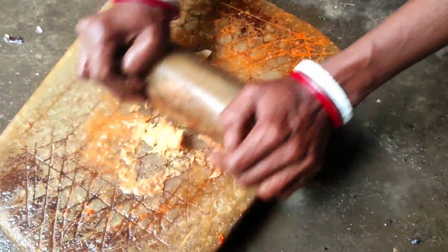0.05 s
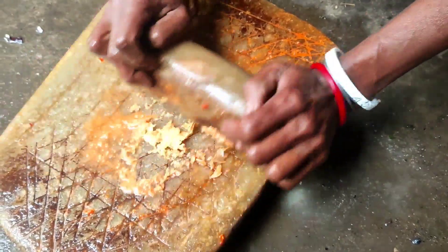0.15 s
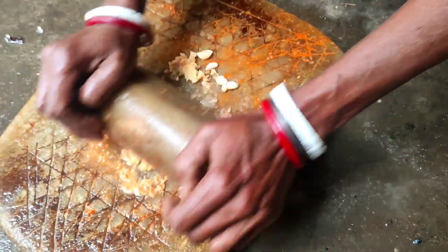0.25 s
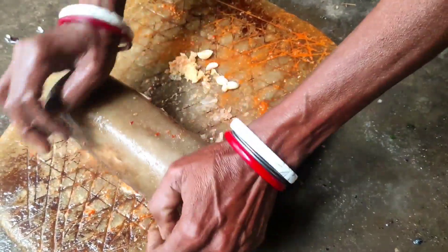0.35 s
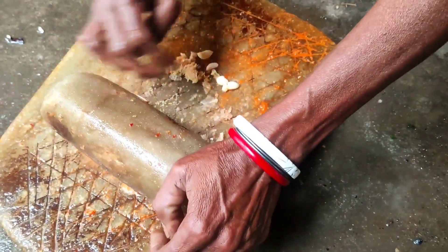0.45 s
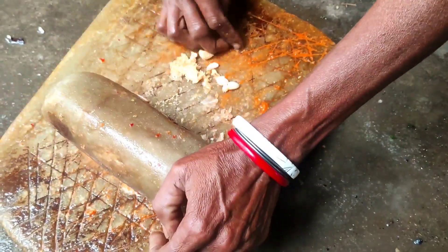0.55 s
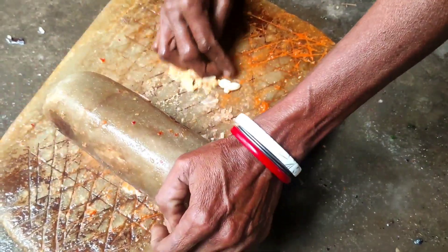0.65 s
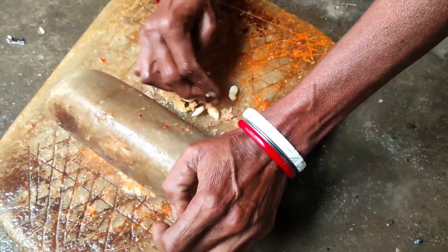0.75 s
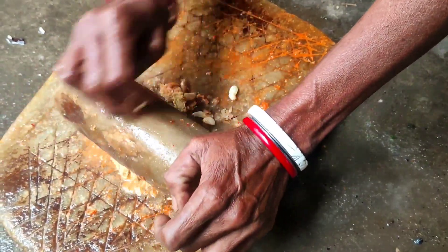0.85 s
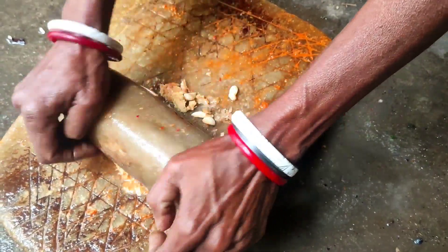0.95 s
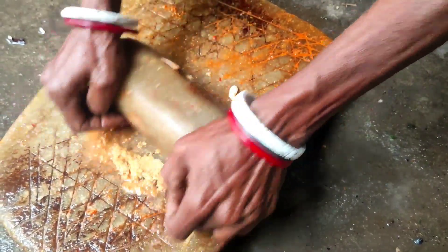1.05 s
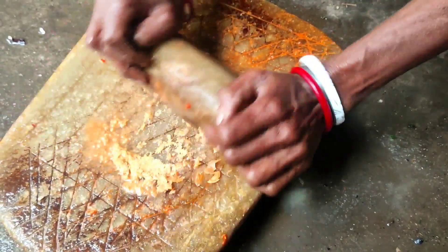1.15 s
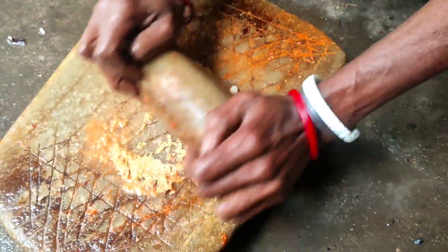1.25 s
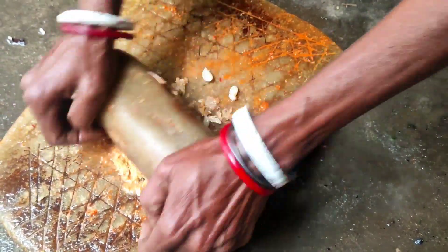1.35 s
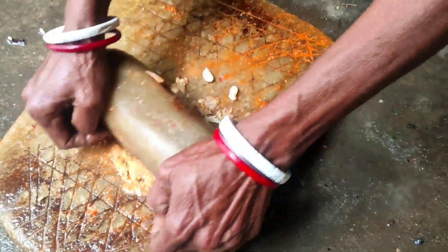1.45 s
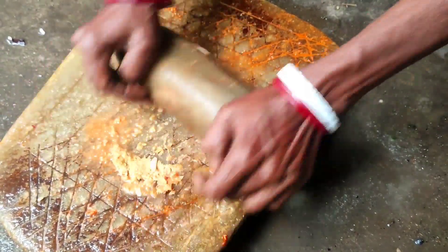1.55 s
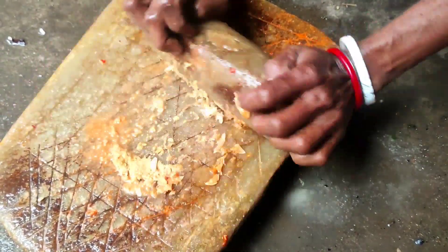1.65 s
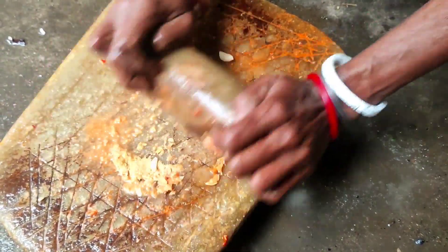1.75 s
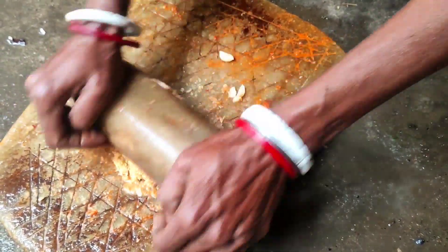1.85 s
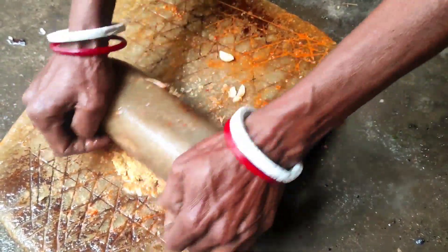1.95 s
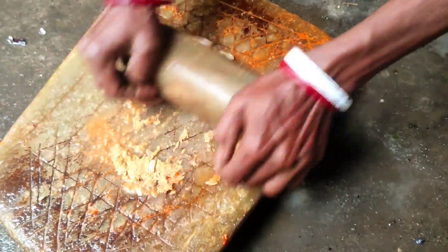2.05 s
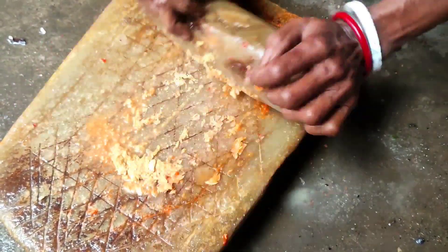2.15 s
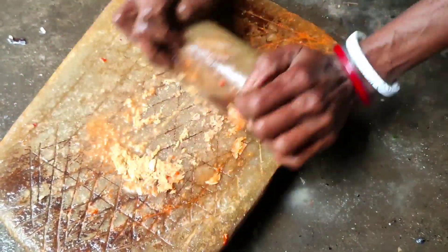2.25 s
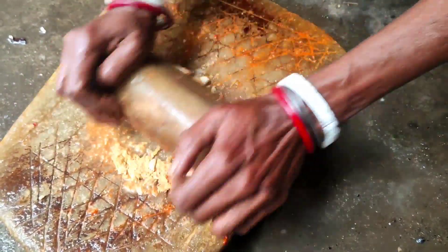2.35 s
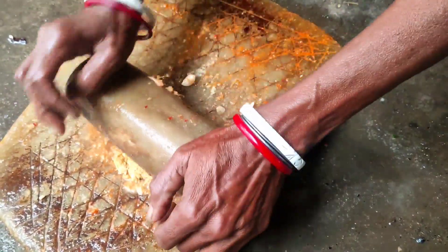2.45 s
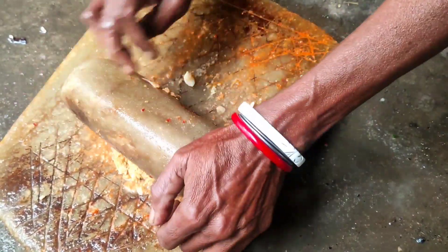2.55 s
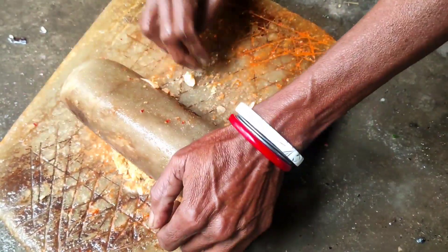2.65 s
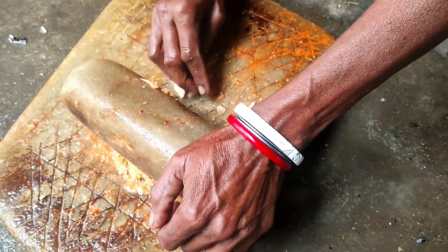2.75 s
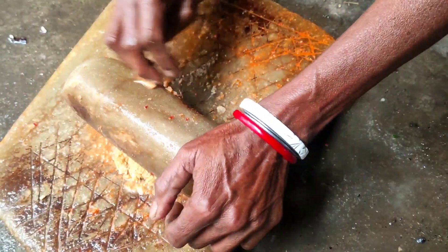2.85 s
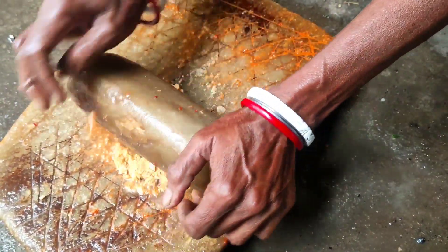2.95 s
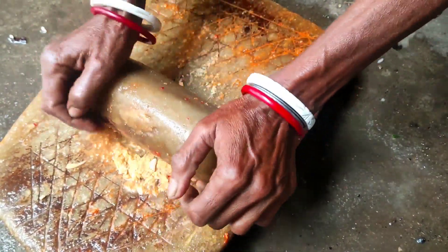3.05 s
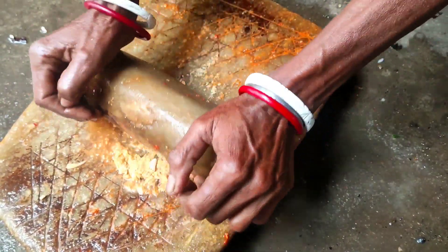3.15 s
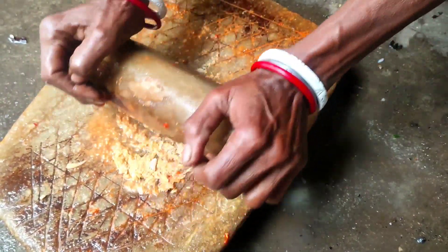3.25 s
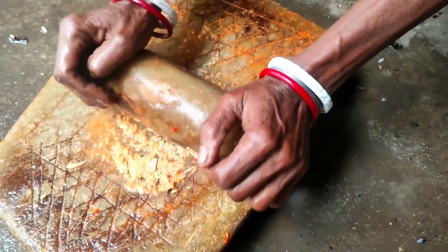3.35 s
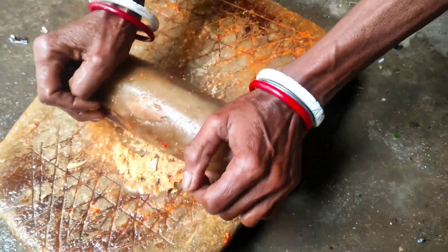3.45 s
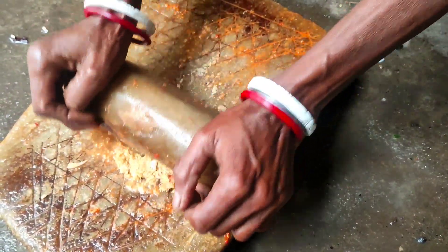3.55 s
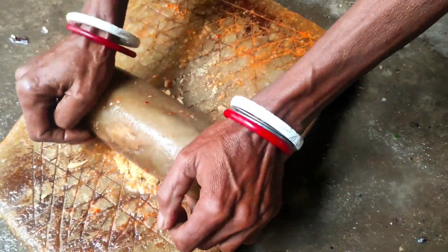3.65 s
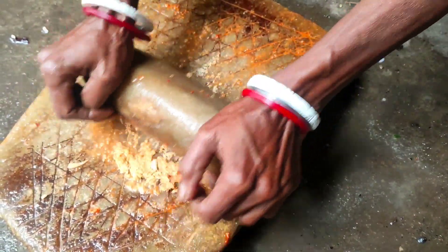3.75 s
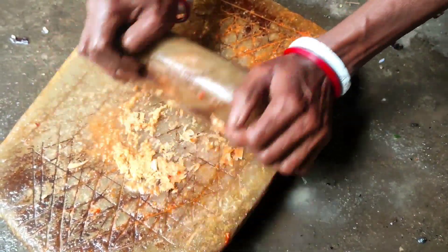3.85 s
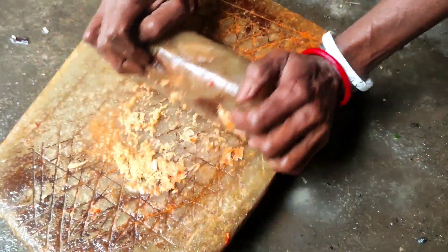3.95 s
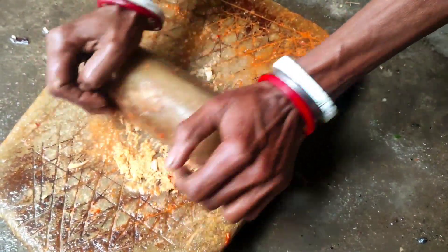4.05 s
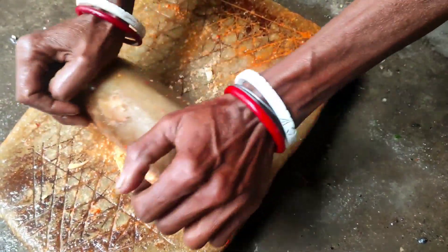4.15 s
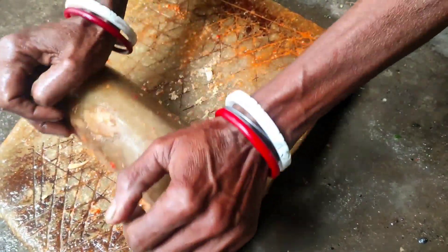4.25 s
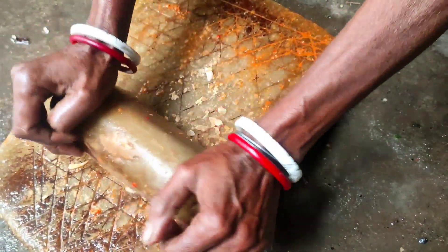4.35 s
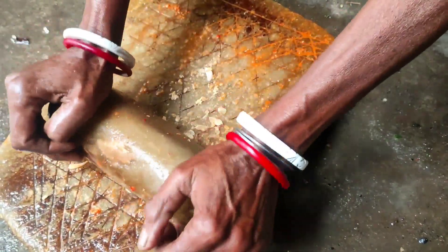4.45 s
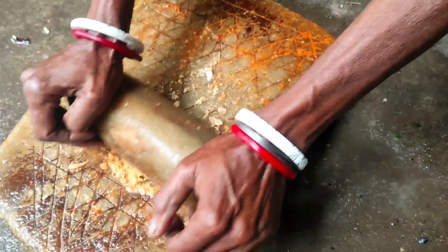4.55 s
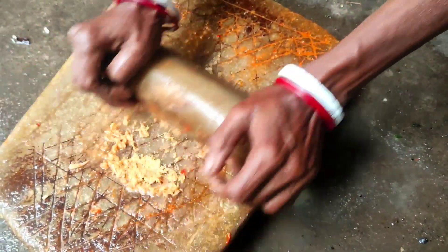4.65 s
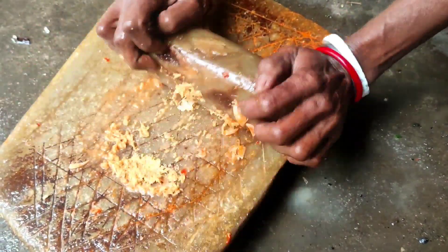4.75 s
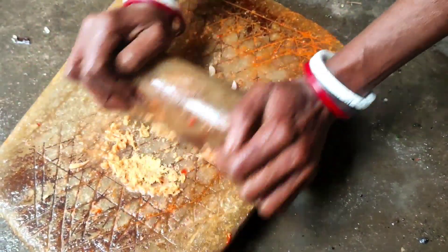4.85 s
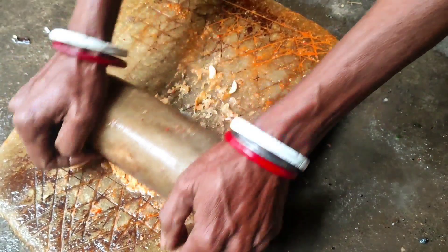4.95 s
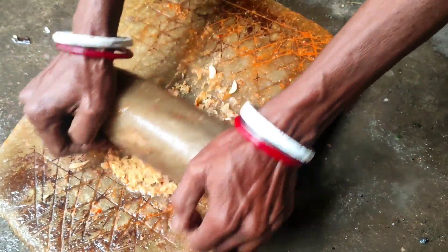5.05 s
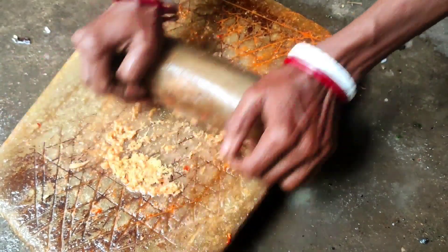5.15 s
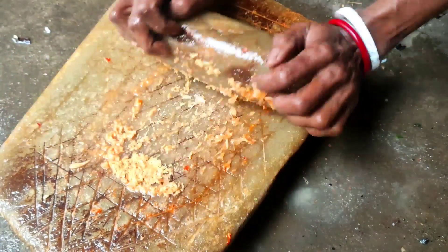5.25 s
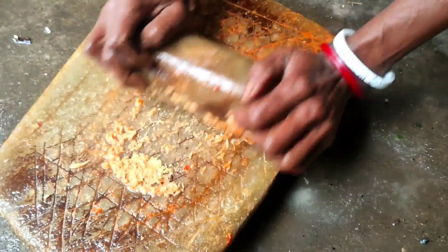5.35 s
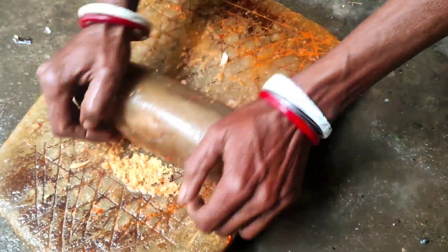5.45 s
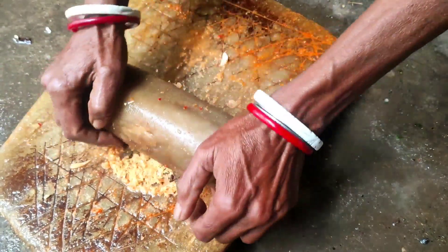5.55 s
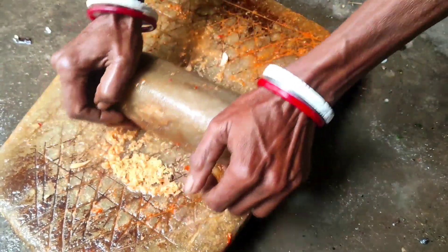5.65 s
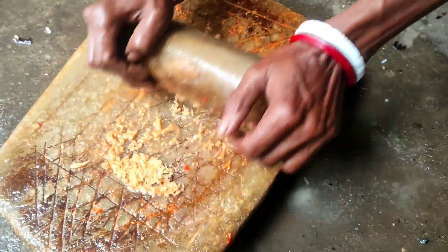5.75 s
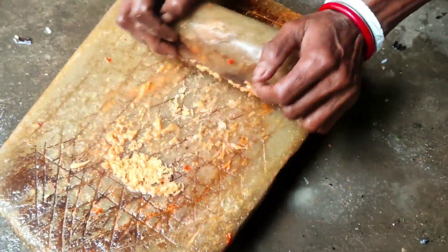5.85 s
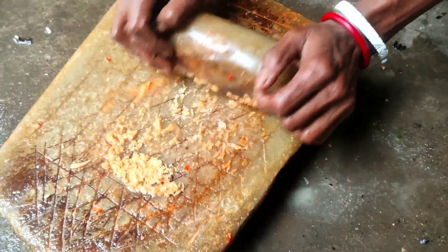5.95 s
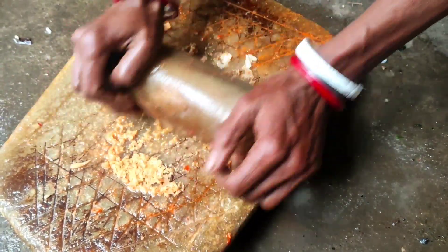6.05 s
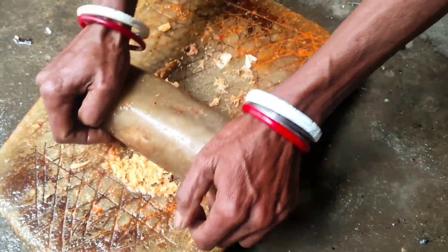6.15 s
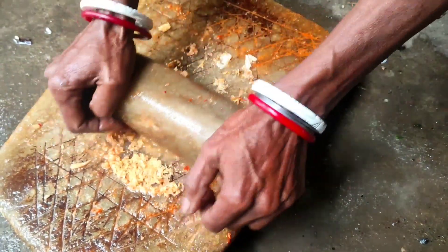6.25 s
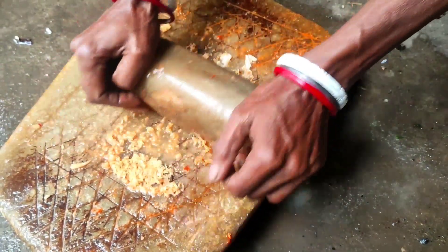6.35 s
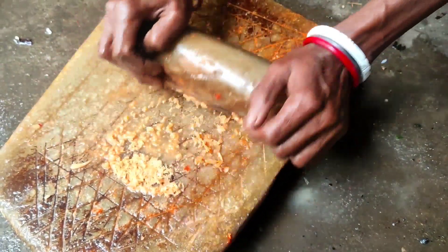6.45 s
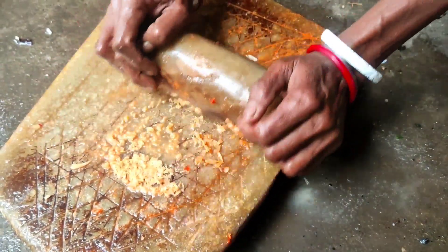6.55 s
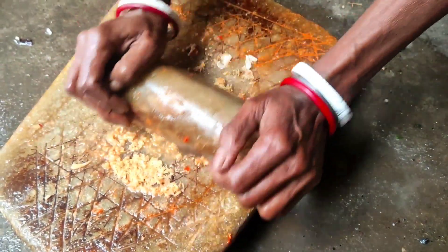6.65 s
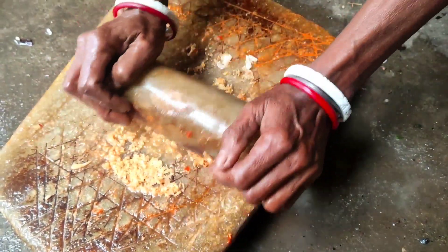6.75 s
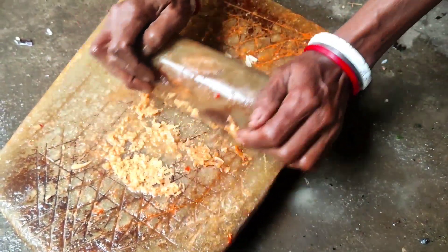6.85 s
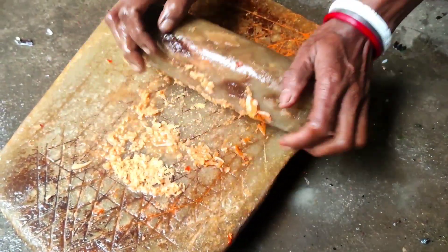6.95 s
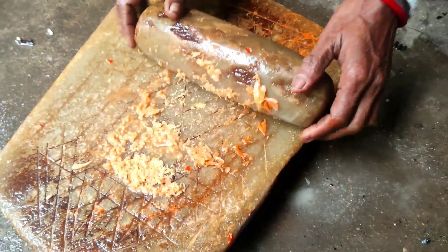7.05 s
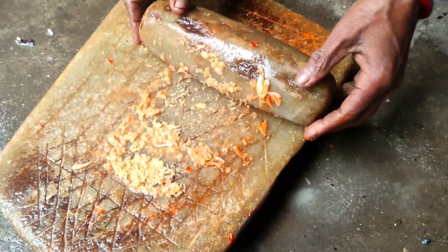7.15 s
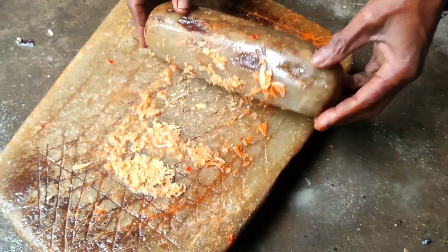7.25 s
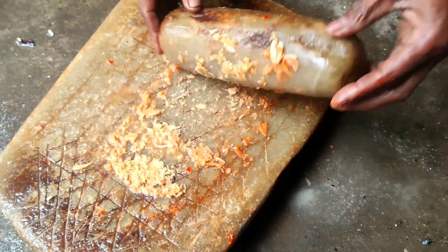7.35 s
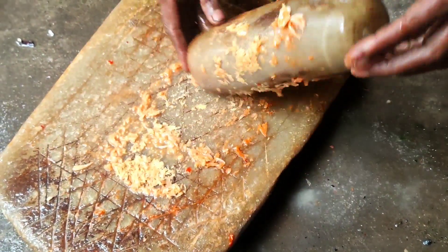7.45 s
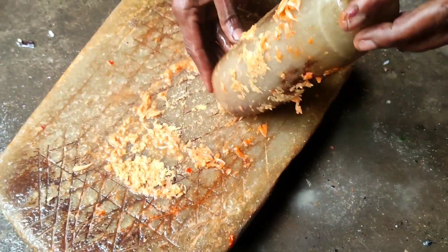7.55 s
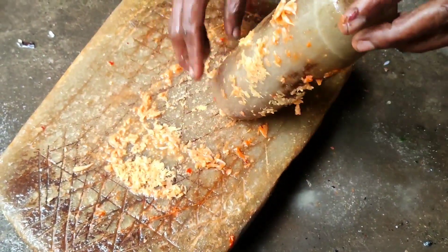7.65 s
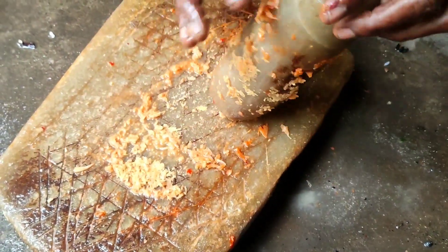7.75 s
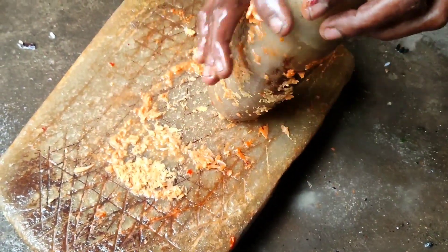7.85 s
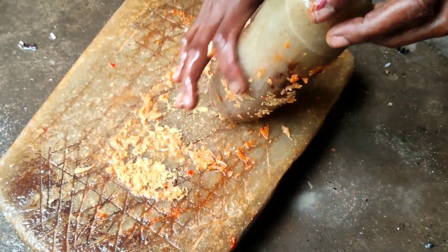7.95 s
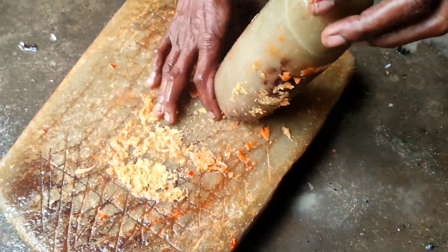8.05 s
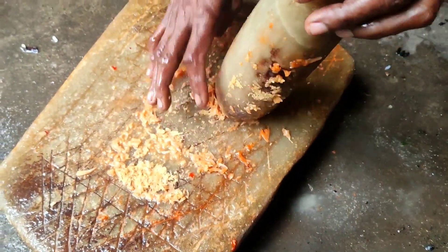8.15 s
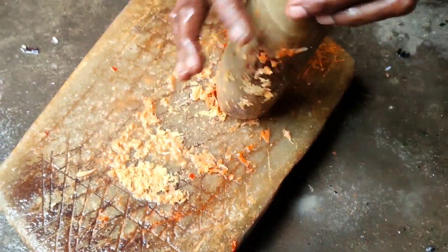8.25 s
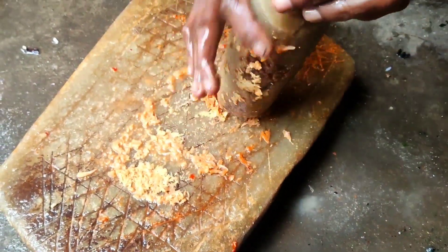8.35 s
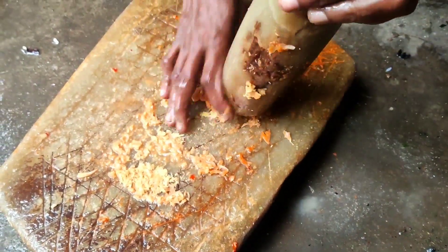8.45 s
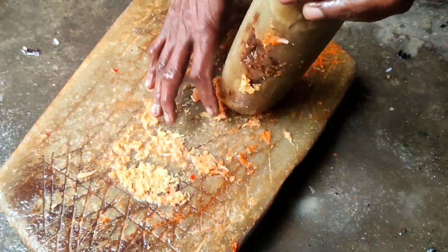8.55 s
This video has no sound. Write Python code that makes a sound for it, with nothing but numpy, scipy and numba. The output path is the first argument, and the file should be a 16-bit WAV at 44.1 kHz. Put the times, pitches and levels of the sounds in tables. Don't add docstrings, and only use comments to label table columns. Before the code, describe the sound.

Hand grinding of spice on a stone slab, heard close in stereo. Faint vessel clinks and soft grit come first, then a cluster of sharp stone knocks with short rattling rebounds, swelling scrapes and thin, dry bangle taps. After a few more isolated clacks, hollow gliding scrapes lead to a weaker final thud and fading grit. A small reverberant room, steady low air noise, the loudest hits slightly clipped.

```python
import sys
import numpy as np
from scipy import signal
from scipy.fft import rfft, irfft, next_fast_len
from scipy.io import wavfile
from numba import njit

SR = 44100
rng = np.random.default_rng(int(sys.argv[2]) if len(sys.argv) > 2 else 0)


def wrap_up_sound(samples):
    columns = np.atleast_2d(samples).T
    tamed = np.clip(columns, -1, 1)
    steps = np.round(tamed * 32767).astype(np.int16)
    wavfile.write(sys.argv[1], SR, steps)


def invert_db(x):
    u = np.asarray(x, float) / 20
    return 10 ** u


N = 379260
TIME = np.arange(N) / SR
PAN_DB, LEFT_LAG_S = 1.2, 0.00013
ROCKING_DB = 3.5


def rms_one(x):
    return x / np.sqrt(np.mean(x ** 2) + 1e-20)


def at_hz(points, hz):
    points = np.array(points)
    return np.interp(np.log(hz), np.log(points[:, 0]), points[:, 1])


def filtered(x, spectrum):
    size = next_fast_len(N)
    hz = np.maximum(np.arange(size // 2 + 1) * SR / size, 1)
    return irfft(rfft(x, size) * invert_db(at_hz(spectrum, hz)), size)[..., :N]


def band(x, low_hz, high_hz):
    return signal.sosfilt(signal.butter(2, [low_hz, high_hz], "band", fs=SR, output="sos"), x)


def high_pass(x, order, hz):
    return signal.sosfilt(signal.butter(order, hz, "high", fs=SR, output="sos"), x)


def drift(rate_hz):
    r = np.exp(-80 * np.pi * rate_hz / SR)
    slow = signal.lfilter([1], [1, -2 * r, r * r], rng.standard_normal(N // 40 + 2002))[2000:]
    return np.interp(np.arange(N) / 40, np.arange(len(slow)), rms_one(slow))


def grains(per_s, spread_db):
    sizes = invert_db(spread_db * np.minimum(rng.exponential(1, N), 4))
    sizes = sizes * rng.choice([-1, 1], N)
    return rms_one(sizes * (rng.random(N) < per_s / SR))


def ring(force, hz, t60):
    r = invert_db(-60 / (max(t60, .002) * SR))
    w = 2 * np.pi * hz / SR
    return signal.lfilter([0, np.sin(w)], [1, -2 * r * np.cos(w), r * r], force + 1e-18)


@njit
def glide(x, hz, r, rate):
    y = np.zeros(len(x))
    for i in range(2, len(x)):
        drive = (1 - r * r) / 2 * (x[i] - x[i - 2])
        y[i] = drive + 2 * r * np.cos(2 * np.pi * hz[i] / rate) * y[i - 1] - r * r * y[i - 2]
    return y


def ports(x, pan_db):
    left = np.interp(TIME - LEFT_LAG_S, TIME, x)
    return np.array([left * invert_db(pan_db / 2), x * invert_db(-pan_db / 2)])


def swells(s, rise_s, fall_s, peak_db, roundness):
    out = np.zeros(N // 20 + 1)
    for at, rise, fall, db in zip(s, rise_s, fall_s, peak_db):
        away = np.arange(len(out)) * 20 / SR - at
        out += invert_db(db - 20 * np.abs(away / np.where(away < 0, rise, fall)) ** roundness)
    return np.interp(np.arange(N) / 20, np.arange(len(out)), out)


MODE_SPREAD_DB = 3.5


def strike(times, touches, strengths_db, modes):
    out = np.zeros(N)
    for hz, level_db, t60 in modes:
        force, own_db = np.zeros(N + SR), MODE_SPREAD_DB * rng.standard_normal(len(times))
        for s, touch, db in zip(times, touches, strengths_db + own_db):
            force[round(s * SR):][:len(touch)] += touch * invert_db(db + level_db)
        out += ring(force[:N], hz, t60)
    return out


# (frequency [Hz], density [dB])
HISS = [(15, -50.5), (25, -6), (200, -2), (427, -1), (775, -3.5), (962, -6.5), (1940, -5), (3520, -8.5),
        (4250, -9), (7110, -13.5), (8140, -23.5), (14000, -24), (16000, -30)]
# (frequency [Hz], likeness [0..1])
HISS_LIKENESS = [(40, 1), (300, 1), (1000, 0.069), (3000, 0.0313), (12000, 0.033)]
HISS_DB = -58.5


def hiss():
    def share(sign):
        points = []
        for hz, db in HISS:
            likeness = np.clip(at_hz(HISS_LIKENESS, hz), 0, .98)
            points.append((hz, db + 10 * np.log10(1 + sign * likeness)))
        return points

    mid, side = rng.standard_normal((2, N))
    mid, side = filtered(mid, share(1)), filtered(side, share(-1))
    return invert_db(HISS_DB + 1.5) * rms_one(np.array([mid + side, mid - side]))


# (delay [s], level [dB])
ECHOES = [(.0031, -21.5), (.0057, -27.5), (.0125, -10), (.0171, -23.5)]
# (frequency [Hz], t60 [s])
ROOM = [(150, 0.81), (700, 0.44), (2000, 0.49), (6000, 0.342), (14000, 0.11)]


def room(x, wet_db):
    after = np.arange(SR // 2) / SR
    tail, white = 0, rng.standard_normal((2, len(after)))
    white = white + 0.64 * signal.lfilter([.1], [1, -.9], white[0] + white[1])
    for low in 60 * 2. ** np.arange(8):
        t60 = max(at_hz(ROOM, low * np.sqrt(2)), .05)
        tail = tail + band(white, low, 2 * low) * invert_db(-60 * after / t60)
    tail = tail * np.minimum(after / 0.0095, 1) * invert_db(wet_db)
    early = np.zeros((2, round(.04 * SR)))
    for k, (s, db) in enumerate(ECHOES):
        left = round(s * SR)
        right = left + 6 * (k % 3)
        early[(0, 1), (left, right)] = invert_db(db) * (-1) ** k
    early = signal.lfilter([.3], [1, -.7], early)
    reflected = signal.fftconvolve(x, early, axes=1)[:, :N]
    return reflected + signal.fftconvolve(x.mean(0)[None], tail, axes=1)[:, :N]


# (time [s], centre [Hz], width [Hz], level
# [dB], t60 [s])
CLINKS = [(0.056, 1370, 170, -44, 0.22), (.07, 2070, 170, -46, 0.16), (0.55, 1385, 200, -45, 0.26),
          (.45, 1340, 130, -55, 2), (2.655, 2700, 905, -53, 0.28), (2.78, 4230, 300, -53, 0.055),
          (1.154, 6770, 920, -39.5, 0.46), (1.155, 5530, 300, -43, 0.4), (1.23, 6620, 626, -35.5, 0.36),
          (1.238, 4120, 258, -39, 0.34), (3.011, 5900, 498, -46, 0.51), (3.008, 6710, 200, -45.5, 0.26),
          (3.011, 5060, 302, -52, 0.47), (4.325, 560, 59, -58, 0.67), (4.33, 1550, 80, -57, 0.33),
          (5.599, 9170, 202, -46, 0.11), (8.135, 4590, 300, -41.5, 0.045), (8.539, 1870, 594, -54.5, 2)]


def clinks():
    after, out = np.arange(SR) / SR, np.zeros((2, N + SR))
    for s, hz, width_hz, db, t60 in CLINKS:
        rattle = rng.standard_normal((2, SR)) * invert_db(1.0 * rng.standard_normal(SR))
        rattle = rattle + 0.25 * rattle[::-1]
        rattle = rms_one(band(rattle, hz - width_hz / 2, hz + width_hz / 2))
        decay = invert_db(db - 60 * after / t60) * np.minimum(after / 0.0062, 1)
        out[:, round(s * SR):][:, :SR] += rattle * decay
    return out[:, :N]


# (time [s], level [dB])
THUMPS = [
    (3.169, -57),
    (3.441, -53),
    (3.672, -40.5),
    (6.956, -54),
    (7.582, -46),
]
# (frequency [Hz], level [dB], t60 [s])
FLOOR = [(65, -3, 0.048), (112, -7, 0.16)]


def thumps():
    s, thump_db = np.transpose(THUMPS)
    push = np.hanning(200) / 100
    return strike(s, [push] * len(s), thump_db - 0.5, FLOOR)


# (fastest moment [s], rise to peak over 20 dB [s], fall over 20 dB [s],
# scrape [dB], grit [dB])
STROKES = [(.02, .2, 0.45, -51.5, -50), (.464, 0.23, 0.43, -49, -54.5), (1.138, 0.054, 0.078, -49, -55),
           (1.255, 0.17, 0.055, -34, -47), (1.36, 0.12, 0.11, -51, -51), (1.62, 0.21, 0.19, -52, -56),
           (1.782, 0.11, 0.17, -47.5, -43.5), (2.02, 0.2, 0.13, -46, -44.5),
           (2.186, 0.15, 0.12, -43, -44.5), (2.37, 0.039, 0.22, -36, -47), (3.034, 0.16, 0.12, -45.5, -49),
           (3.48, 0.094, 0.075, -39, -52.5), (3.798, 0.19, 0.2, -46.5, -47.5), (4.04, 0.1, 0.39, -56, -53),
           (4.496, 0.051, 0.38, -40, -46.5), (5.0, 0.28, 0.48, -38, -47.5), (5.33, 0.18, 0.31, -51, -49),
           (6.16, 0.23, 0.77, -43, -48.5), (6.56, 0.31, 0.22, -38, -41), (7.45, .15, 0.52, -40, -46.5),
           (7.74, 0.19, 0.22, -36.5, -47.5), (8.07, 0.033, 0.11, -56, -56), (8.5, 0.035, 0.81, -56, -57)]
STROKE_ROUND = 1.96
RESTING_SCRAPE_DB, RESTING_GRIT_DB = -90, -66.5


def pressure():
    s, rise_s, fall_s, scrape_db, grit_db = np.transpose(STROKES)
    scraping = swells(s, rise_s, fall_s, scrape_db, STROKE_ROUND) + invert_db(RESTING_SCRAPE_DB)
    grinding = swells(s, rise_s, fall_s, grit_db, STROKE_ROUND) + invert_db(RESTING_GRIT_DB)
    return scraping, grinding


# (time [s], rattle [dB], rise over 20 dB [s], fall over 20 dB [s])
SHAKES = [(.02, -61, 0.14, 0.4), (.186, -67, 0.028, 0.45), (0.389, -33.5, 0.032, 0.058),
          (.694, -60, 0.028, 0.025), (1.057, -55.5, 0.011, 0.05), (1.17, -46.5, 0.022, 0.11),
          (1.252, -44.5, 0.046, 0.11), (1.462, -31, 0.014, 0.066), (1.7, -55.5, 0.044, 0.56),
          (1.946, -38.5, 0.028, 0.12), (2.29, -76, 0.009, 0.01), (2.395, -42, 0.019, 0.055),
          (2.488, -40, 0.051, 0.057), (3.012, -51, 0.057, 0.094), (3.224, -53, 0.03, 0.042),
          (3.427, -45.5, 0.016, 0.043), (3.58, -51.5, 0.07, 0.025), (3.693, -44, 0.045, 0.045),
          (4.009, -39, 0.005, 0.011), (4.201, -36, 0.082, 0.038), (4.452, -34.5, 0.0052, 0.029),
          (4.638, -45, 0.065, 0.12), (4.846, -53, 0.044, 0.36), (5.048, -37, 0.014, 0.044),
          (5.557, -36, 0.039, 0.052), (6.211, -42.5, 0.0044, 0.072), (6.64, -56.5, .03, 0.075),
          (6.789, -39, 0.024, 0.061), (7.27, -49, 0.028, 0.023), (8.04, -64.5, 0.057, 0.21)]
# (time [s], peak [dB], left over right [dB])
TAPS = [(0.183, -37, 0), (0.384, -30, 4), (0.677, -43, 4), (1.059, -43, -5), (1.1628, -28, 3.5),
        (1.469, -25, -5), (1.745, -28, 4.5), (1.942, -32, 5), (2.3974, -37, 7), (2.4575, -28, 7),
        (2.783, -47, 1.5), (2.229, -33, 11), (2.243, -31.5, 11), (2.4817, -26.5, 4.5), (2.8782, -30.5, 3),
        (3.227, -36.5, 6), (3.4288, -30.5, 9), (3.57, -29.5, -2.5), (3.6611, -39, -7), (3.67, -27, 17),
        (3.9913, -45, 4), (4.0083, -31, -8), (4.18, -30, 0), (4.1952, -20.5, -3), (5.0315, -29, 1),
        (5.5303, -49, 0), (5.5493, -30.5, -2), (6.344, -43, -1), (4.105, -37, 9), (4.6326, -21.5, 5),
        (4.848, -31, 4), (4.9395, -33.5, 13), (5.0519, -20.5, 0), (5.341, -26.5, 11.5), (5.634, -38, 1),
        (5.788, -36.5, 1), (6.06, -32.5, 2), (6.2147, -22.5, 7), (6.6348, -30.5, 0.5),
        (6.7744, -30.5, -3.5), (7.1803, -40, 2), (7.25, -44.5, 11), (7.567, -43, 8), (8.031, -38.5, 16),
        (8.0967, -45, -2), (8.1387, -42.5, 8)]
# (frequency [Hz], level [dB], t60 [s])
BANGLES = [(4250, -3, .03), (4700, -6, .02), (6070, -3, .03), (6750, -3, .03), (7350, -6, .03),
           (9250, -2, .03), (9570, 0, .03), (10800, -5, .02), (11900, -4, .02), (12600, -1, .02),
           (13900, -6, .02), (15400, -6, .006)]
# (frequency [Hz], density [dB])
RUSTLE = [(1470, -48), (2500, -6), (4310, 4.5), (5190, -1.5), (6600, 3.5), (8800, -1.5), (9510, -1),
          (12400, -1), (16000, -22)]
SHAKE_ROUND = 0.82
DRAG_RATTLE_DB = -27
RING_SHARE_DB = -33


def bangles():
    s, shake_db, rise_s, fall_s = np.transpose(SHAKES)
    dragging = pressure()[1] - invert_db(RESTING_GRIT_DB)
    shaking = swells(s, rise_s, fall_s, shake_db, SHAKE_ROUND) + invert_db(DRAG_RATTLE_DB) * dragging
    effort, after = shaking * invert_db([[1.5], [-1.5]]), np.arange(1323) / SR
    for s, db, pan_db in TAPS:
        at = round(s * SR)
        sides_db = pan_db / 2 * np.array([[1], [-1]])
        effort[:, at:at + len(after)] += invert_db(db - 10.5 + sides_db) * np.exp(-after / 0.005)
    apart = np.array([grains(6600, 5.2), grains(5500, 3.5)])
    shower = 0.43 * grains(6000, 2.25) + 1.31 * apart
    white = shower * effort
    rung = sum(invert_db(db) * ring(white, hz, 1.6 * t60) for hz, db, t60 in BANGLES)
    flecks = 0
    for low in 2000 * 1.25 ** np.arange(9):
        flecks = flecks + band(shower, low, 1.25 * low) * invert_db(2.0 * drift(30))
    return effort * rms_one(filtered(flecks, RUSTLE)) + invert_db(RING_SHARE_DB) * rung


# (start [s], length [s], from [Hz], to [Hz], level [dB])
WEDGE = [
    (3.722, 0.26, 900, 764, -58.5),
    (4.992, 0.25, 1390, 574, -45),
    (5.184, 0.16, 760, 520, -46.5),
    (6.172, 0.22, 685, 700, -52.5),
    (6.398, 0.14, 920, 1290, -43.5),
    (6.584, 0.17, 760, 510, -51),
    (7.636, 0.14, 1950, 1790, -41),
    (7.715, 0.33, 1135, 730, -53),
]


def wedge_motion():
    s, length_s, from_hz, to_hz, db = np.transpose(WEDGE)
    corners_s = np.ravel([s, s + length_s], "F")
    hz = np.exp(np.interp(TIME, corners_s, np.log(np.ravel([from_hz, to_hz], "F"))))
    return hz, swells(s + length_s / 2, length_s / 2, length_s / 2, db, 3.0)


PATCHY_DB = 2.6


def patchy(x, per_s):
    edges = 600 * 1.25 ** np.arange(15)
    out = x
    for low, high in zip(edges, edges[1:]):
        out = out + band(x, low, high) * (invert_db(PATCHY_DB * drift(per_s)) - 1)
    return out


# (frequency [Hz], density [dB])
SCRAPE = [(71, -50), (120, -30), (162, -12), (262, -22.5), (369, -13), (477, -7), (1310, -3), (1580, -1.5),
          (1840, 1), (3600, -2), (4680, -34), (7920, -120)]
# (frequency [Hz], density [dB])
GRIT = [(2400, -32), (3000, -1), (3500, 3), (4200, 8.5), (5000, 4), (6500, 3), (7500, -1.5), (9000, -9.5),
        (12000, -30.5), (16000, -57)]
WEDGE_WIDTH_HZ = 380


def scrape():
    scraping, grinding = pressure()
    wedge_hz, hollow = wedge_motion()
    lumps = invert_db(0.91 * drift(23.6))
    stone = grains(5000, 0.74) * lumps
    r = np.exp(-np.pi * WEDGE_WIDTH_HZ / SR)
    wedge = glide(stone * invert_db(ROCKING_DB * drift(36)), wedge_hz, r, SR)
    wedge = rms_one(glide(wedge, wedge_hz, r, SR))
    apart = band(np.array([grains(5000, 7.1), grains(5000, 1.5)]) * lumps, 860, 11700)
    body = rms_one(filtered(ports(stone, PAN_DB) + .5 * apart, SCRAPE))
    crunch = invert_db(2.25 * drift(27))
    shared = 0.19 * ports(grains(6000, 1.1), PAN_DB)
    own = np.array([grains(6000, 2.0), grains(6000, 3.4)])
    grit = rms_one(filtered(crunch * (shared + own), GRIT))
    stroke = patchy(invert_db(-2.5) * scraping * body + invert_db(-3.0) * grinding * grit, per_s=9.2)
    return stroke + ports(hollow * wedge, PAN_DB)


# (time [s], roller ring [dB], slab [dB], thud [dB], stumble [s])
BUMPS = [(0.2794, -51, -46, -55, 0.018), (0.502, -37, -66, -57, 0.018), (1.103, -29, -29.5, -41, 0.031),
         (1.143, -28, -34, -65, 0.011), (1.594, -37, -39, -45, 0.013), (2.202, -25.5, -34, -42, 0.027),
         (3.167, -56, -53, -29.5, 0.0025), (3.6698, -29.5, -45, -44.5, 0.014),
         (4.1715, -26.5, -39, -45.5, 0.014), (4.874, -56, -44, -44, 0.0078),
         (4.794, -30, -77, -55.5, 0.0072), (5.434, -24, -35.5, -41.5, 0.013),
         (6.119, -50, -57, -48, 0.0087), (7.5832, -48, -32, -36.5, 0.0035)]
# (frequency [Hz], level [dB], t60 [s])
ROLLER = [(1300, -7, .025), (1580, -6, .03), (1755, -4, .035), (1890, -4, .035), (2035, 0, .06),
          (2148, -2, .06), (2215, -2, .06), (2600, -9, .02)]
# (frequency [Hz], level [dB], t60 [s])
SLAB = [(590, -2, .035), (720, 1, .035), (885, -2, .03), (975, -3, .03), (1110, -4, .025)]
# (frequency [Hz], level [dB], t60 [s])
THUD = [(178, 0, .05), (240, 4, 0.045), (320, 5, .035), (385, 4, 0.03), (445, 4, 0.03)]


def bumps():
    s, ring_db, slab_db, thud_db, stumble_s = np.transpose(BUMPS)
    after = np.arange(4410) / SR
    touches = rng.standard_normal((len(s), len(after))) * (rng.random((len(s), len(after))) < .07)
    fading = np.exp(-after / np.maximum(stumble_s, .002)[:, None])
    touches *= 0.26 * np.minimum(after / 0.002, 1) * fading
    touches = signal.lfilter([.35], [1, -.65], touches)
    rings = strike(s, touches, ring_db - 6.5, ROLLER) + strike(s, touches, slab_db + 0.5, SLAB)
    return band(rings, 440, 1700) + strike(s, touches, thud_db - 0.5, THUD)


def chatter(rows, swell_s):
    after, out = np.arange(1764) / SR, np.zeros(N + SR)
    shape = after / swell_s * np.exp(1 - after / swell_s)
    for s, db, hz in rows:
        out[round((s - swell_s) * SR):][:len(after)] -= invert_db(db) * shape * np.sin(2 * np.pi * hz * after)
    return out[:N]


def settle(times, levels_db, low_hz, high_hz, t60, apart):
    after, swell = np.arange(SR // 2) / SR, np.zeros(N + SR)
    for s, db in zip(times, levels_db):
        decay = invert_db(db - 60 * after / t60) * np.minimum(after / 0.00043, 1)
        swell[round(s * SR):][:len(after)] += decay
    both, left, right = rng.standard_normal((3, N))
    lumps = ports(both, PAN_DB) + apart * np.array([left, right])
    lumps = lumps * invert_db(ROCKING_DB * drift(42))
    return swell[:N] * rms_one(band(lumps, low_hz, high_hz))


# (time [s], clack [dB], clack [Hz], roller ring [dB], slab [dB])
KNOCKS = [(1.2401, -10.5, 1840, -17, -19), (1.6288, -26, 860, -39, -30), (1.7016, -8, 1690, -21, -15),
          (1.8391, -9.5, 2070, -13, -20.5), (2.136, -20.5, 955, -27, -24.5),
          (2.2907, -2.5, 2080, -2.5, -12.5), (2.3812, -40, 2020, -27.5, -31),
          (2.8705, -37.5, 1160, -39, -55), (3.0178, -29.5, 1510, -24, -65),
          (3.4399, -11.5, 930, -13.5, -17), (3.9838, -20, 1130, -24, -17), (4.1296, -23, 1030, -37, -27.5),
          (4.4488, -0.5, 2150, -2, -8.5), (5.9665, -2.5, 1900, -9, -30), (6.0598, -42, 2020, -28, -36),
          (6.9545, -11.5, 2090, -13.5, -19), (7.584, -28, 426, -49, -30)]
# (time [s], peak [dB], frequency [Hz])
ROLLER_CHATTER = [(1.2411, -28, 1800), (1.2462, -18, 1850), (1.2571, -30, 1910), (1.2607, -32, 1900),
                  (1.7023, -6, 1780), (1.7193, -22, 1660), (1.8393, -9, 1820), (1.8539, -36, 2160),
                  (1.865, -32, 2140), (2.1369, -23, 1700), (2.1418, -33, 1930), (2.2036, -28, 1750),
                  (2.291, -2.5, 2020), (2.2984, -36, 2090), (2.3018, -14, 2020), (2.3062, -14, 2190),
                  (2.3125, -32, 1970), (2.3177, -14, 1970), (2.3219, -21.5, 2170), (2.3287, -35, 1960),
                  (2.3358, -27, 1990), (2.3401, -40, 1870), (2.3516, -55, 2050), (2.3611, -19, 2110),
                  (2.3847, -45, 2080), (2.3889, -33, 2040), (2.4024, -34, 2010), (3.0198, -30.5, 1670),
                  (3.4407, -15, 1970), (3.4469, -21, 2150), (3.4499, -29, 2170), (3.4537, -30, 2140),
                  (3.459, -29, 1870), (3.4664, -24, 2140), (3.4712, -31, 2015), (3.9851, -24, 1800),
                  (4.4518, -7.5, 1750), (4.4643, -17, 1890), (4.47, -20, 1780), (4.4757, -15, 1910),
                  (4.48, -16, 2000), (4.486, -30, 2060), (4.4924, -29, 2030), (4.5098, -48, 2120),
                  (4.5207, -30, 2020), (4.5437, -25, 1970), (4.5471, -20, 2040), (5.967, -5.5, 1795),
                  (5.9706, -12.5, 2210), (5.9812, -22.5, 2070), (5.9853, -34.5, 1750), (5.9919, -29, 1960),
                  (5.9973, -20, 2080), (6.062, -24, 2100), (6.955, -15.5, 1930), (6.9593, -23, 1930),
                  (6.9636, -22, 2040), (6.9695, -26, 1900)]
# (time [s], peak [dB], frequency [Hz])
SLAB_CHATTER = [(1.108, -32, 860), (1.1205, -34, 820), (1.1373, -34, 780), (1.1465, -31, 795),
                (1.1504, -27, 730), (1.16, -31.5, 704), (1.2456, -18.5, 800), (1.2534, -26, 730),
                (1.5964, -37, 860), (1.6049, -42, 710), (1.6301, -28.5, 863), (1.6395, -35, 676),
                (1.7024, -16.5, 948), (1.7194, -42, 780), (1.8397, -41, 790), (1.8516, -31.5, 770),
                (2.1379, -26.5, 840), (2.1445, -21.5, 865), (2.1486, -31, 830), (2.2035, -32, 920),
                (2.2114, -27, 970), (2.2173, -39, 834), (2.2235, -36, 885), (2.2281, -26.5, 640),
                (2.2929, -34, 880), (2.2984, -18, 746), (2.3036, -19.5, 737), (2.3144, -30.5, 810),
                (2.3305, -41, 744), (3.4413, -16, 842), (3.4477, -21.5, 710), (3.4588, -38, 810),
                (3.9851, -41, 850), (3.99, -37, 730), (4.1307, -31, 940), (4.1694, -32.5, 750),
                (4.1756, -38, 816), (4.1843, -37, 750), (4.4506, -10.5, 840), (4.4711, -57, 825),
                (5.9671, -20, 1050), (5.9817, -33, 860), (6.9569, -29, 920), (6.961, -32, 770),
                (7.5841, -31.5, 800)]
ROLLER_SWELL_S, SLAB_SWELL_S = .0009, 0.001744
CRUSH_S, CRUSH_DB = .003, -29
THUD_UNDER_SLAB_DB = 22.5


def knocks():
    s, clack_db, clack_hz, ring_db, slab_db = np.transpose(KNOCKS)
    after, out = np.arange(2205) / SR, np.zeros(N + SR)
    touches = rng.standard_normal((len(s), len(after))) * (rng.random((len(s), len(after))) < .04)
    touches *= invert_db(-11) * np.exp(-after / 0.002)
    touches[:, :5] = np.hanning(7)[1:-1] / 3
    lead = round(CRUSH_S * SR)
    crush = invert_db(CRUSH_DB) * rng.standard_normal((len(s), lead)) * np.linspace(0, 1, lead)
    start_s, touches = s - CRUSH_S, np.hstack([crush, touches[:, :-lead]])
    for at, db, hz, touch in zip(start_s, clack_db, clack_hz, touches):
        clack = ring(touch, hz, 0.0069)
        clack += invert_db(-4.5) * ring(touch, 0.8 * hz, 0.0051) + invert_db(-11.5) * ring(touch, 1.2 * hz, 0.019)
        clack += invert_db(-6) * ring(touch, 2900, .006) + invert_db(-12) * ring(touch, 3700, .005)
        out[round(at * SR):][:len(after)] -= invert_db(db + 2.86) * clack
    rings = strike(start_s, touches, ring_db - 8.0, ROLLER) + strike(start_s, touches, slab_db - 10.0, SLAB)
    struck = band(out[:N] + rings, 280, 4100)
    struck = struck + strike(start_s, touches, slab_db - THUD_UNDER_SLAB_DB, THUD)
    struck = struck + chatter(ROLLER_CHATTER, ROLLER_SWELL_S) + chatter(SLAB_CHATTER, SLAB_SWELL_S)
    tails = settle(s, ring_db - 24.0, 1940, 2210, t60=0.52, apart=0.71)
    tails = tails + settle(s, slab_db - 27.0, 410, 930, t60=0.51, apart=0.9)
    tails = tails + settle(s, ring_db - 22.0, 2390, 3900, t60=0.076, apart=1.0)
    return ports(struck, PAN_DB) + tails


def scene():
    near = knocks() + ports(bumps(), PAN_DB) + scrape() + bangles()
    near = high_pass(near, 3, 130)
    return near + room(near, wet_db=-39.5) + thumps() + clinks() + hiss()


def low_pass(x):
    return signal.sosfilt(signal.butter(12, 15780, fs=SR, output="sos"), x)


def record(dry):
    tips = high_pass(dry - np.clip(dry, -.95, .95) + 1e-18, 2, 300)
    return low_pass(dry - tips)


dry = scene()
out = record(dry)
wrap_up_sound(out)
```